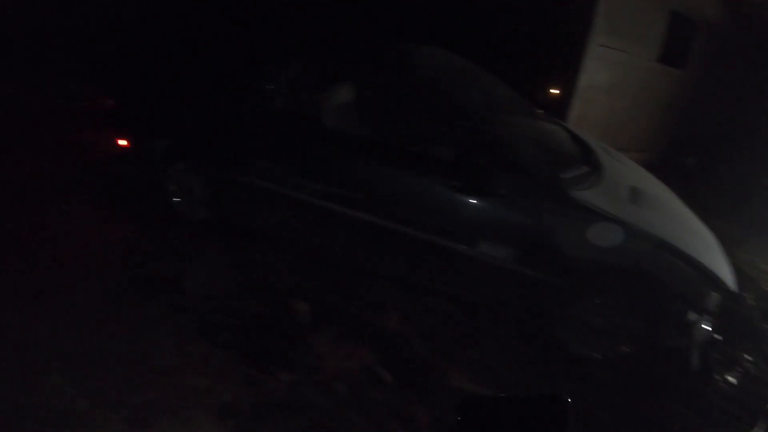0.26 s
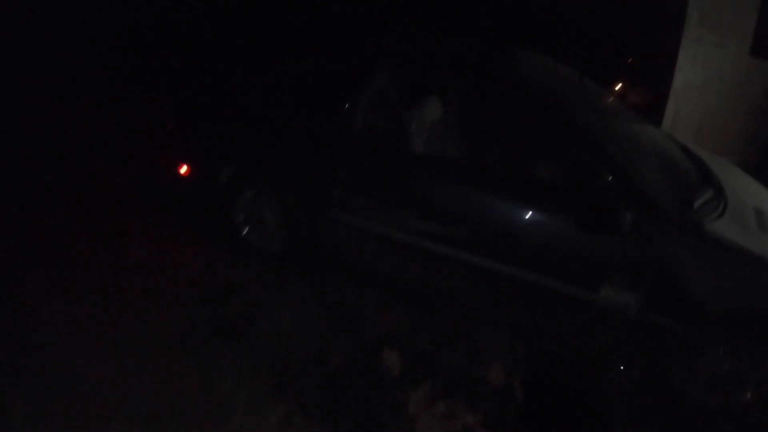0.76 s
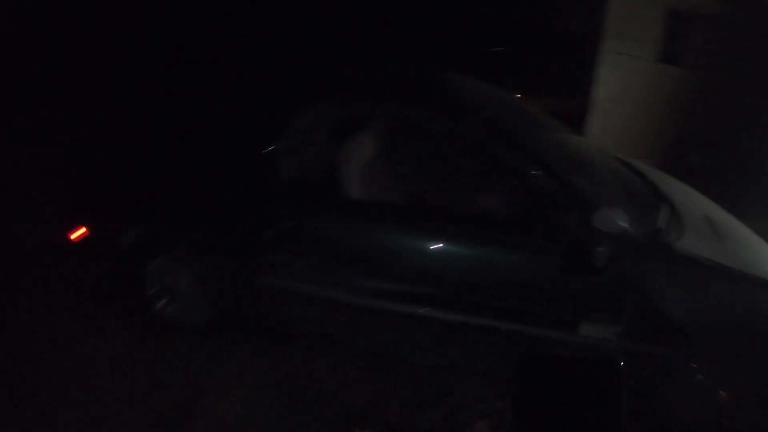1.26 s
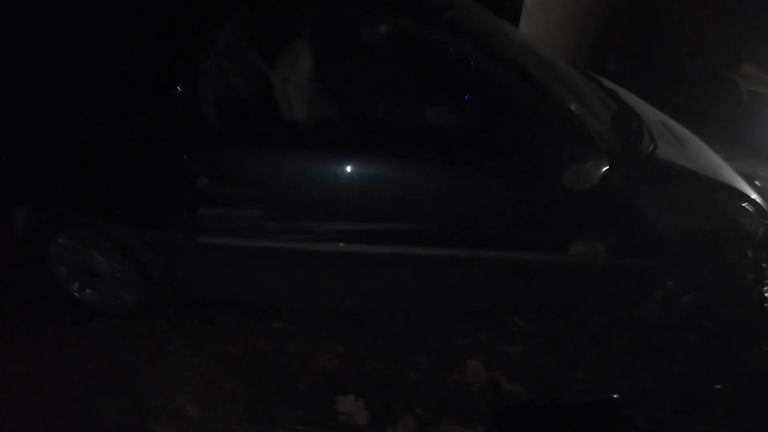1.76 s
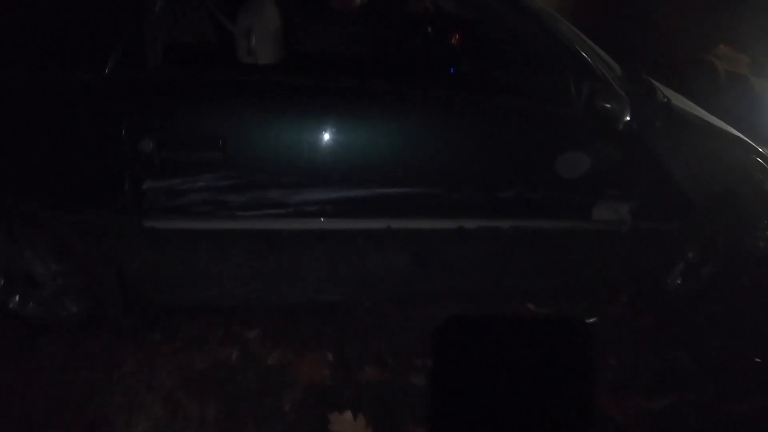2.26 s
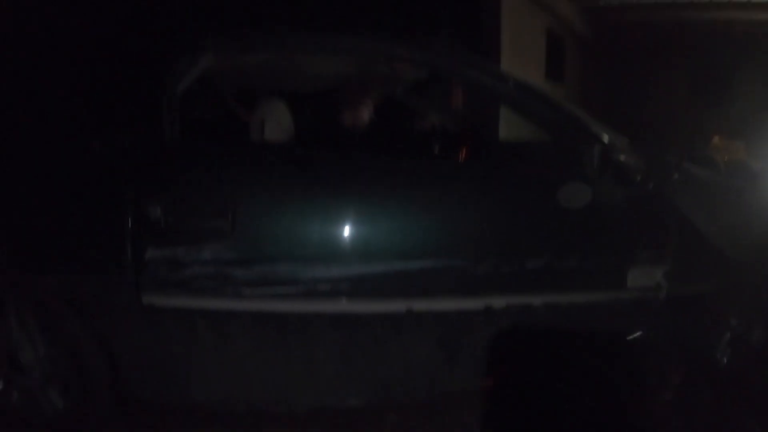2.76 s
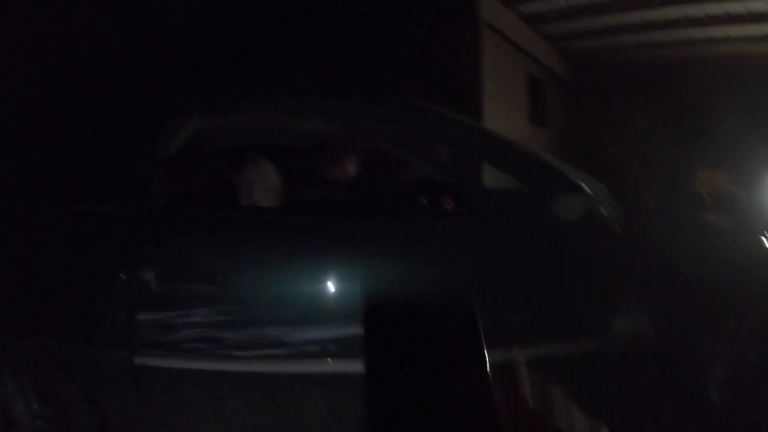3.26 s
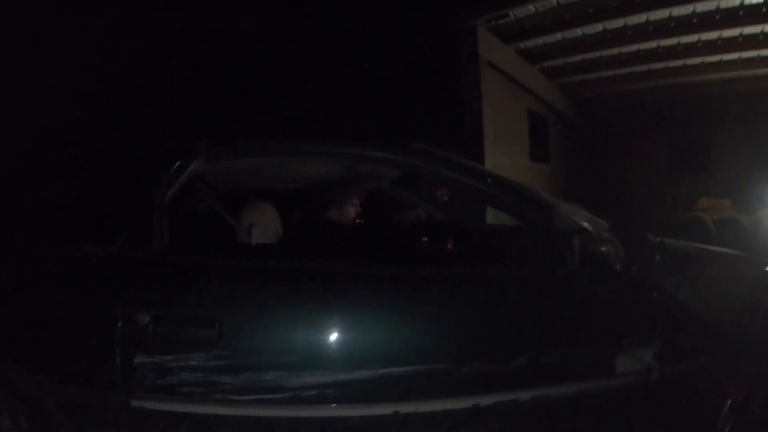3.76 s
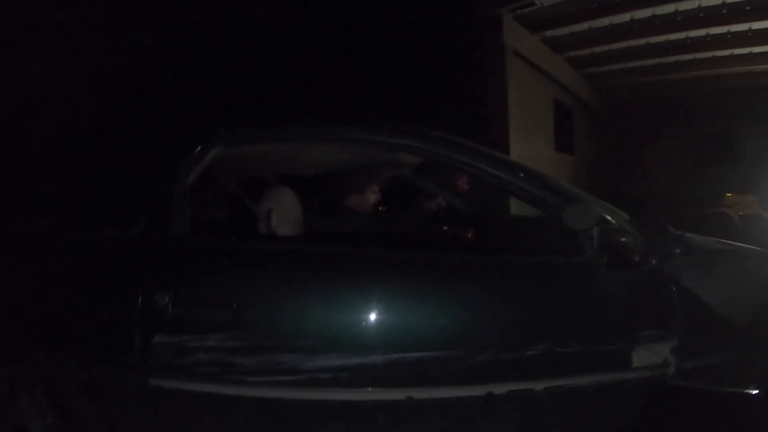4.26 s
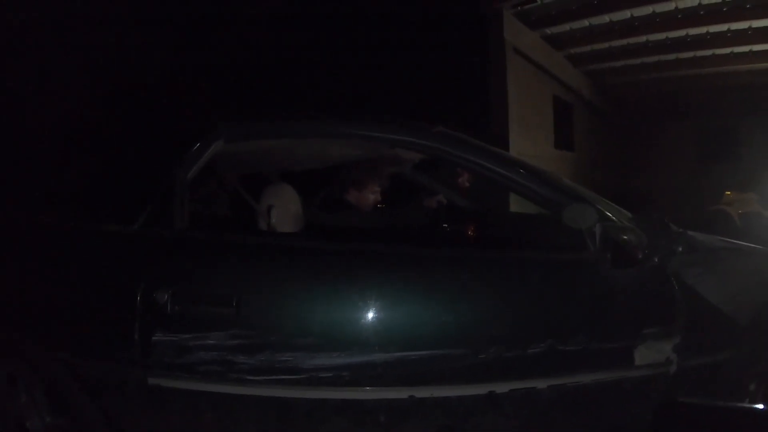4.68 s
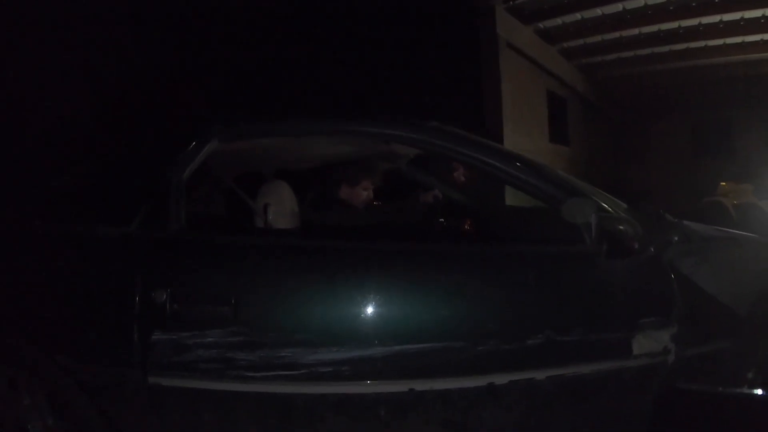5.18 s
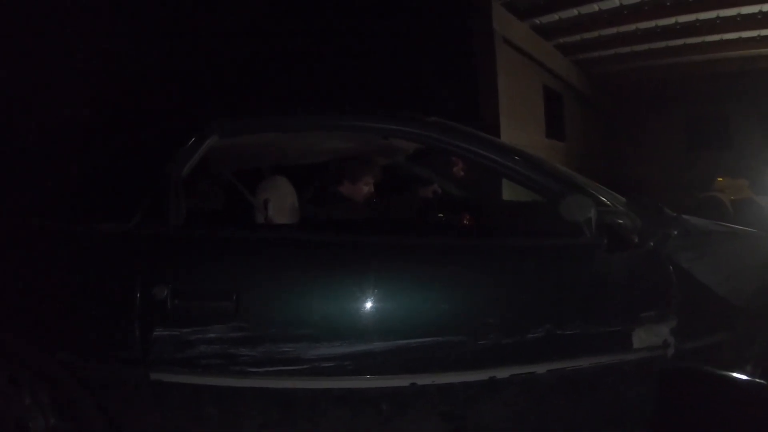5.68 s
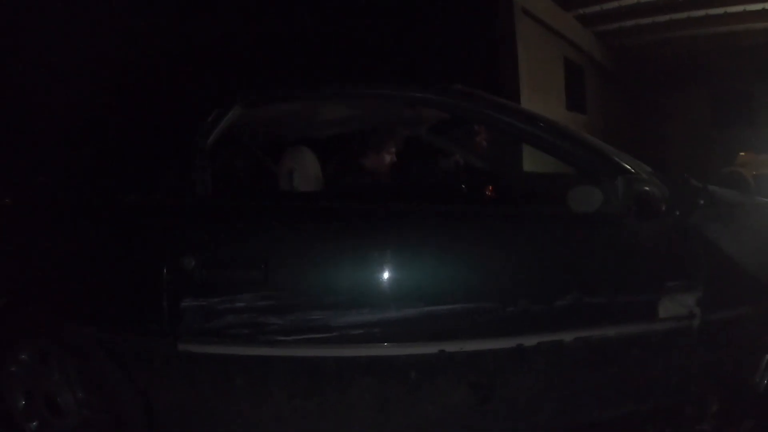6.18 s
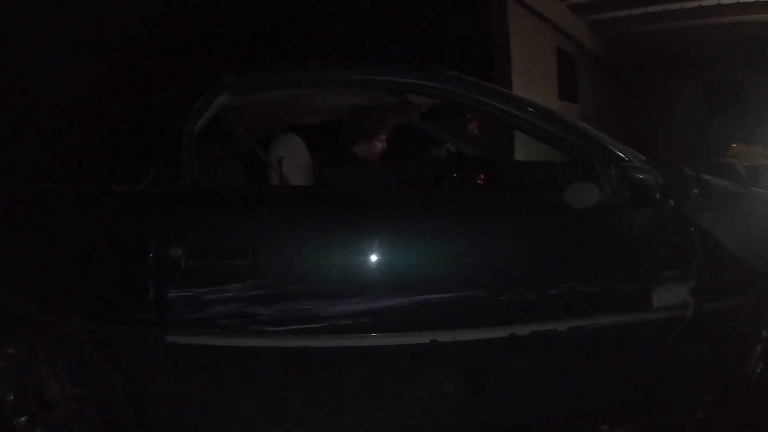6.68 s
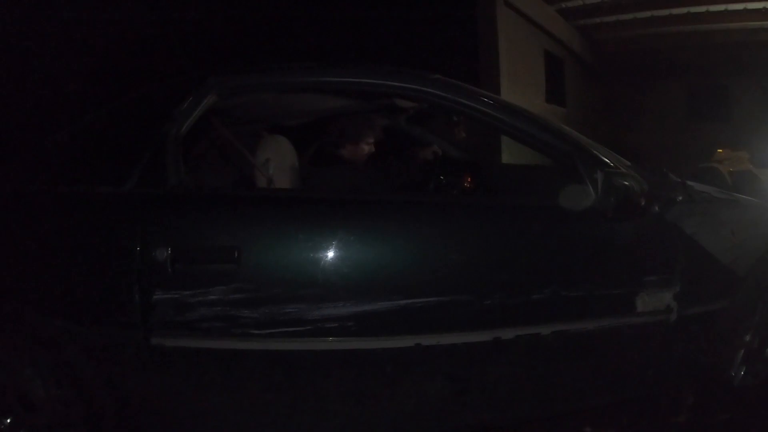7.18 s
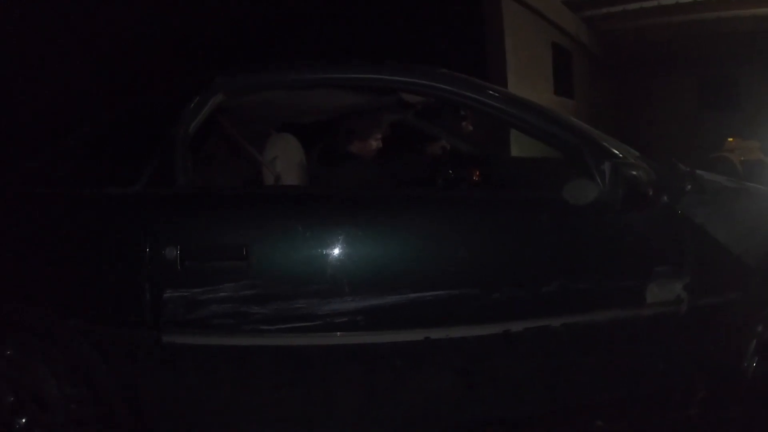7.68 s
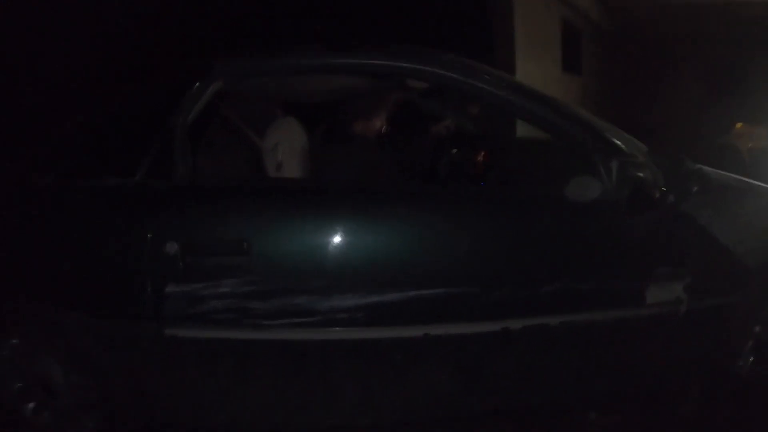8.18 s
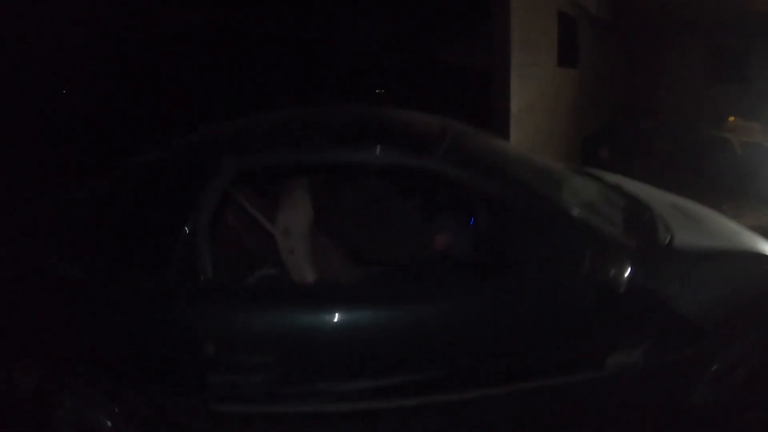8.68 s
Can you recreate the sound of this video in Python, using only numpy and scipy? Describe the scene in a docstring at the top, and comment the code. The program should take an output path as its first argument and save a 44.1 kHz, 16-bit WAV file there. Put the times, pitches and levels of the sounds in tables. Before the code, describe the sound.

At night in a yard, a large petrol car engine labours at low revs a few steps from a small stereo microphone. The throttle is dabbed over and over; the deep, uneven exhaust boom swells and sags with rough gas roar and pops. Leaves and grit crunch, mechanical hiss sits above, one brief squeal rises. Revs climb later, then the driver lifts off and the sound drops away.

```python
"""A V8 petrol car labours at low revs, the throttle dabbed again and again, until the driver lifts off.
Exhaust: multiples of the cycle boom, uneven firing pulses ring the pipes, gas roars as noise, tailpipe pops ring.
Engine bay: banded hiss, a fading rough band, one rising squeal. Low tones hum at steady pitch.
Crackle bursts are leaves and grit crunching; steady banded noise is the night in the yard.
A small two-port microphone stands a few steps from the car's side."""
import sys
import numpy as np
from scipy import signal
from scipy.fft import rfft, irfft, next_fast_len
from scipy.io import wavfile
from scipy.ndimage import uniform_filter1d

SR = 44100
rng = np.random.default_rng(int(sys.argv[2]) if len(sys.argv) > 2 else 0)


def generate_wav(signal):
    """Clip the signal to [-1, 1] and save it as 16-bit WAV at the path in sys.argv[1]."""
    frames = np.transpose(np.atleast_2d(signal))
    scaled = np.clip(frames, -1, 1) * 32767
    pcm = np.round(scaled).astype(np.int16)
    wavfile.write(sys.argv[1], SR, pcm)


N = 394246
CUTOFF_HZ = 15100


def from_db(db):
    """Gain of a level in dB."""
    return 10 ** (np.asarray(db) / 20)


def rms_one(x):
    """Scaled to unit rms."""
    return x / np.sqrt(np.mean(x ** 2) + 1e-20)


def in_time(rows):
    """Columns of a curve table, one value a sample."""
    time_s, *columns = np.transpose(rows)
    return [np.interp(np.arange(N) / SR, time_s, column) for column in columns]


def at_hz(points, hz):
    """A spectrum table read on a log-frequency axis."""
    points = np.array(points)
    return np.interp(np.log(hz), np.log(np.maximum(points[:, 0], 1)), points[:, 1])


def drift(rate_hz):
    """Slow chance of spread 1: noise through a double one-pole low-pass, run at SR / 40."""
    r = np.exp(-80 * np.pi * rate_hz / SR)
    noise = rng.standard_normal(N // 40 + 2002)
    slow = signal.lfilter([1], [1, -2 * r, r * r], noise)[2000:]
    return np.interp(np.arange(N) / 40, np.arange(len(slow)), rms_one(slow))


def resonance(x, hz, width_hz):
    """Two-pole band-pass, gain 1 on top."""
    r = np.exp(-np.pi * width_hz / SR)
    poles = [1, -2 * r * np.cos(2 * np.pi * hz / SR), r * r]
    return signal.lfilter(np.array([1, 0, -1]) * (1 - r * r) / 2, poles, x)


def white():
    """Two unrelated (mid, side) noises."""
    return rng.standard_normal((2, 2, N))


# left-right likeness: pitch_hz, likeness (0 to 1)
LIKENESS = [(60, 0.9), (250, 0.97), (500, 0.57), (1000, .75), (2000, 0.56), (4000, 0.63), (8000, 0.13),
            (12000, 0.34)]


def two_ports(mid, side, hz):
    """Left and right as alike as the pitch allows: shared mid, opposed side."""
    alike = np.clip(at_hz(LIKENESS, hz), 0, 1)
    return np.sqrt(1 + alike) * mid + np.sqrt(1 - alike) * side * [[1], [-1]]


def narrow(hz, width_hz):
    """Two-port noise passed twice through one resonance; rms 1."""
    once = resonance(rng.standard_normal((2, N)), hz, width_hz)
    mid, side = resonance(once, hz, width_hz)
    return rms_one(two_ports(mid, side, hz))


def banded(source, spectrum, patchy_db):
    """Bands of a (mid, side) source, each with its own level, flicker and likeness; rms 1."""
    low_hz, top_hz = spectrum[0][0], min(spectrum[-1][0], CUTOFF_HZ)
    count = round(2.5 * np.log2(top_hz / low_hz))  # 2.5 bands an octave
    edges_hz = np.geomspace(low_hz, top_hz, count + 1)
    out, together = 0, drift(1.9)
    for k, band_hz in enumerate(zip(edges_hz, edges_hz[1:])):
        band = signal.butter(2, band_hz, "band", fs=SR, output="sos")
        mid, side = signal.sosfilt(band, source[k % 2])
        hz = np.sqrt(band_hz[0] * band_hz[1])
        flicker_db = patchy_db * (0.4 * together + drift(18.0))
        out = out + from_db(at_hz(spectrum, hz) + flicker_db) * two_ports(mid, side, hz)
    return rms_one(out)


# steady background: pitch_hz, relative density_db (per Hz)
NIGHT = [(880, -35.5), (1500, -4.5), (1640, 6), (2300, -22.5), (3350, -25), (4630, -8), (4760, -14),
         (5690, -6.5), (7750, -30.5), (10100, -60.5), (17000, -120)]
NIGHT_DB = -59


def night_air():
    """Steady background noise in flickering bands."""
    return from_db(NIGHT_DB) * banded(white(), NIGHT, patchy_db=1.5)


# crunches of leaves and grit: start_s, level_db, decay_s (to 1/e)
CRUNCHES = [(0.5194, -32, .012), (0.7494, -38, .01), (1.2462, -31.5, .012), (1.7194, -33, 0.024),
            (1.926, -28.5, 0.0083), (2.373, -34, .01), (2.6636, -42, .008), (3.2494, -32, 0.0098),
            (3.3528, -34, .01), (3.5379, -34, 0.0078), (3.634, -36, 0.0097), (3.9441, -34, .01),
            (4.9121, -35, .01), (5.7192, -35, 0.011), (7.0694, -31.5, .012), (7.2848, -30.5, .01),
            (7.337, -30.5, 0.033), (8.1944, -41.5, .012), (8.2305, -46, 0.0082), (8.2484, -44, .01)]
# crunch colour: pitch_hz, relative density_db (per Hz)
GRIT = [(900, -5.5), (2500, 0.5), (4200, -4.5), (6200, 3.5), (8500, -10.5), (13000, -29), (15000, -35)]
CRUNCH_RISE_S, CRACKLE_CREST_DB = .0015, 10


def crunches(hiss_db):
    """Sharp bursts of dense uneven crackle; small random ones follow the hiss level."""
    swell, since_s = np.zeros(N), np.arange(6000) / SR
    for start_s, level_db, decay_s in CRUNCHES:
        shape = np.minimum(since_s / CRUNCH_RISE_S, 1) * np.exp(-since_s / decay_s)
        swell[round(start_s * SR):][:6000] += from_db(level_db - CRACKLE_CREST_DB) * shape
    starts = rng.random(N) < 9.0 / SR  # 9 a second on average
    small = starts * from_db(hiss_db - 11.5 + 4.2 * np.minimum(rng.exponential(1, N), 3))
    swell += signal.lfilter([1], [1, -np.exp(-1 / (0.0033 * SR))], small + 1e-18)
    crackle = white() * from_db(2.5 * np.minimum(rng.exponential(1, N), 4))
    return swell * banded(crackle, GRIT, patchy_db=2.0)


# hiss colour: pitch_hz, relative density_db (per Hz)
HISS = [(1500, -6), (1700, 5), (2080, 2), (2720, 2), (3250, 0.5), (3810, 0), (4720, -12), (5940, -1.5),
        (7750, -9), (10100, -21), (12500, -43), (15000, -54)]
# narrow hiss bands: pitch_hz, width_hz (each pass), level_db (re hiss), waver_db
WHINES = [(3160, 85, -16.5, 2.5), (3265, 60, -20, 2.5), (3560, 60, -17, 2.5), (6100, 1300, -5.5, .8)]
# rough band that fades and returns: time_s, level_db
RING_LEVEL = [(0, -52), (.8, -50.5), (1.5, -54), (1.9, -53), (2.6, -57), (3.1, -57.5), (4.0, -66),
              (7.9, -71), (8.15, -82), (8.22, -61), (8.38, -80), (8.62, -62), (8.94, -56)]
RING_HZ, RING_WIDTH_HZ = 1310, 330
# brief rising squeal: time_s, pitch_hz, level_db
SQUEAL = [(2.44, 1572, -73), (2.5, 1623, -55), (2.53, 1657, -51), (2.57, 1720, -53), (2.62, 1699, -53),
          (2.68, 1760, -57), (2.76, 1759, -78)]
SQUEAL_HZ, SQUEAL_WIDTH_HZ, SQUEAL_HISS_DB = 1670, 200, 0  # rough band around the squeal


def engine_bay(hiss_db):
    """Belts, fan and valve gear blur into hiss with narrow bands; a lower band fades, one squeal rises."""
    hiss = banded(white(), HISS, patchy_db=1.6)
    for hz, width_hz, level_db, waver_db in WHINES:
        hiss = hiss + from_db(level_db + waver_db * drift(1.2)) * narrow(hz, width_hz)
    ring = from_db(in_time(RING_LEVEL)[0]) * narrow(RING_HZ, RING_WIDTH_HZ)
    squeal_hz, squeal_db = in_time(SQUEAL)
    unsteady_hz = squeal_hz + 12 * drift(30)
    tone = np.sqrt(2) * np.sin(2 * np.pi * np.cumsum(unsteady_hz) / SR)
    squeal = tone + from_db(SQUEAL_HISS_DB) * narrow(SQUEAL_HZ, SQUEAL_WIDTH_HZ)
    return from_db(hiss_db) * hiss + from_db(squeal_db) * squeal + ring


# steady low tones: pitch_hz, level_db (re hum level)
HUM_TONES = [(34.5, 2.5), (69, -5), (103.5, 0), (173, -9.5), (259, -16)]
# hum level: time_s, level_db (added to the engine's share)
HUM_LEVEL = [(0, 5), (.2, 7), (.32, -0.5), (.45, -1), (.7, -1), (1.0, -4), (1.5, -5), (1.9, 2), (2.3, 1),
             (2.7, 4), (3.2, 1), (4.0, -1.5), (4.6, -0.5), (5.0, -5), (5.4, 3), (6.0, -6), (7.0, -7),
             (7.8, -6.5), (8.1, -4), (8.94, -7.5)]


def hum(swing_db):
    """Low tones hold their pitch while the revs move, and waver in level."""
    time_s, (level_db,) = np.arange(N) / SR, in_time(HUM_LEVEL)
    out = 0
    for hz, tone_db in HUM_TONES:
        gain = from_db(level_db + swing_db + tone_db + 2.8 * drift(2.0))
        out = out + gain * np.sin(2 * np.pi * (hz * time_s + rng.random()))
    return out


# dabs of throttle: pressed_s, released_s, boom_db, harshness_db, jolt_db
DABS = [(0.0, 0.19, -20.5, 0.5, 1), (0.455, 0.63, -20.5, -0.5, 0.5), (0.624, 0.74, -17, -0.5, 1.5),
        (0.902, 1.48, -18.5, 1.5, -1.5), (1.52, 1.6, -18.5, 0.5, -4), (1.805, 2.88, -18, -0.3, -1.5),
        (2.873, 2.98, -20, -3, -1.5), (3.15, 3.37, -18, 1, -3), (3.525, 3.84, -17.5, -0.5, 3),
        (3.9, 4.46, -18.5, 2, 2), (4.49, 5.52, -17.5, 0, -1.5), (5.547, 5.97, -19.5, 4, -2),
        (5.872, 6.6, -17, 0, 0), (6.828, 7, -17.5, -5.5, 6.5), (7.081, 7.078, -16.5, -4.5, 3.5),
        (7.192, 7.04, -15.5, -2, -1), (7.31, 7.75, -17, 0.5, 6), (7.533, 7.89, -17.5, 2.5, -2),
        (7.97, 8.01, -25, -6, 3), (8.13, 8.16, -24, -7, 1.5), (8.2, 8.33, -24, -4.5, -2.5),
        (8.39, 8.43, -26, -8.5, -0.5), (8.72, 9.3, -25.5, -9.5, 3.5), (8.86, 8.943, -21.5, -3, -2.5)]
RISE_DB_PER_S, FALL_DB_PER_S, COAST_DB = 138, 94, -29
FULL_DB = -18  # reference load
JOLT_S = 0.2  # to 1/e


def throttle():
    """Load (dB re full) and harshness from the strongest dab; each dab adds a dying jolt."""
    time_s = np.arange(0, N / SR + .002, .002)[:, None]
    pressed_s, released_s, boom_db, harsh_db, jolt_db = np.transpose(DABS)
    before_s, after_s = np.maximum(pressed_s - time_s, 0), np.maximum(time_s - released_s, 0)
    ramps_db = boom_db - RISE_DB_PER_S * before_s - FALL_DB_PER_S * after_s
    load_db = np.maximum(ramps_db.max(axis=1), COAST_DB) - FULL_DB
    harshness_db = uniform_filter1d(harsh_db[ramps_db.argmax(axis=1)], size=30)
    decay = np.exp(-np.maximum(time_s - pressed_s, 0) / JOLT_S) * (time_s >= pressed_s)
    jolts_db = np.sum(jolt_db * decay, axis=1)
    return in_time(np.column_stack([time_s, load_db, harshness_db, jolts_db]))


# firings in order: level_db, pipe_delay_ms
CYLINDERS = [(-1.5, 1.34), (-3, 3.96), (-4, 0.77), (1, 0.31), (-11.5, 4.42), (-2, 3.27), (-3.5, 1.31),
             (-1.5, 3.13)]


def firings(cycles, spread_db, jitter_s):
    """Eight clicks a cycle; each cylinder has its own strength and pipe delay, plus chance."""
    count = np.floor(8 * cycles).astype(int)
    at = np.flatnonzero(np.diff(count))
    level_db, delay_ms = np.array(CYLINDERS)[count[at] % 8].T
    chance = rng.standard_normal((1200, 2))[:len(at)]
    delay_s = delay_ms / 1000 + jitter_s * chance[:, 0]
    arrive = at + (SR * delay_s).astype(int)
    clicks = np.zeros(N)
    clicks[np.clip(arrive, 0, N - 1)] = from_db(level_db + spread_db * chance[:, 1])
    return clicks


# exhaust gas colour: pitch_hz, relative density_db (per Hz)
ROAR = [(14, -15), (28, -9), (60, -18), (108, -10), (182, -13), (242, -15.5), (403, -24), (557, -25),
        (628, -29.5), (760, -41)]
# body panels and intake colour: pitch_hz, relative density_db (per Hz)
RATTLE = [(380, -37.5), (650, -2), (732, 1), (798, -0.5), (983, 3), (1470, -19.5), (1800, -25.5),
          (2340, -50.5), (3960, -120)]


def gas_roar(clicks, roar_db, rattle_db):
    """Turbulent gas noise, lightly puffed by each firing, and the car's shell buzzing along."""
    puffs = signal.lfilter([1], [1, -np.exp(-1 / (0.0027 * SR))], clicks)
    gas = white() * (1.5 + puffs)
    roar = from_db(roar_db) * banded(gas, ROAR, patchy_db=1.0)
    return roar + from_db(rattle_db) * banded(gas, RATTLE, patchy_db=1.0)


# tailpipe pops: start_s, level_db
POPS = [(0.941, -27.5), (2.194, -26), (2.554, -26.5), (3.349, -24.5), (5.353, -27), (6.69, -24),
        (7.4, -18.5), (7.418, -22.5), (7.922, -30), (8.211, -29.5), (8.24, -31), (8.278, -36), (8.432, -43),
        (8.815, -35), (8.874, -35), (8.9, -29)]
# modes a pop rings: pitch_hz, level_db, t60_s
TAILPIPE = [(180, -8, 0.13), (301, -2, 0.06), (454, -6.5, 0.065), (562, -8, 0.046), (734, -7.5, 0.034),
            (1030, -14.5, 0.017)]
POP_SOFT_HZ = 1800


def pops():
    """Unburnt gas pops ring decaying tailpipe modes, each with a chance strength, dulled on top."""
    start_s, pop_db = np.transpose(POPS)
    chance, out = rng.standard_normal((len(start_s), len(TAILPIPE))), 0
    for k, (hz, mode_db, t60_s) in enumerate(TAILPIPE):
        clicks = np.full(N, 1e-18)
        clicks[(start_s * SR).astype(int)] = from_db(pop_db + mode_db + 2 * chance[:, k])
        r, w = from_db(-60 / (t60_s * SR)), 2 * np.pi * hz / SR
        out = out + signal.lfilter([0, np.sin(w)], [1, -2 * r * np.cos(w), r * r], clicks)
    return signal.sosfilt(signal.butter(2, POP_SOFT_HZ, fs=SR, output="sos"), out)


# 12th to 34th multiple of the cycle: level_db (re one firing a cycle)
GROWL_DB = [6, 10.5, 19.5, 16, 11.5, 11, 13.5, 10, 10.5, 12.5, 15.5, 14.5, 16.5, 15.5, 7, 15.5, 7.5, 10.5,
            5, 9.5, 15, 4, 7]


def growl(cycles, cycles_hz):
    """The regular part of the firing: upper multiples of the cycle, scaled like a pulse train's."""
    tones = 0
    for k, level_db in enumerate(GROWL_DB, 12):
        gain = from_db(level_db + 1.5 * drift(2))
        tones = tones + gain * np.sin(2 * np.pi * (k * cycles + rng.random()))
    return 2 * cycles_hz / SR * tones


# upper pipe modes: pitch_hz, width_hz (each pass), gain_db
PIPES = [(114.4, 5.5, -12), (143, 30, -5.5), (162.2, 19.5, 2), (178.9, 25, 1), (207, 26, -11),
         (258.6, 17, -13), (324, 55.5, -10.5), (444.8, 26, -11.5), (497.5, 35, -14.5), (563.7, 32, -11.5)]
# level of the ringing pipes: time_s, level_db
BARK_LEVEL = [(0.0, -31.5), (0.25, -27.5), (0.37, -41), (0.55, -28.5), (0.74, -33.5), (1.04, -21.5),
              (1.44, -22), (1.72, -35), (2.09, -24), (2.14, -30.5), (2.41, -18.5), (2.46, -22.5),
              (2.51, -19.5), (2.61, -23.5), (2.66, -22), (3.09, -38.5), (3.39, -25), (3.44, -35),
              (4.26, -21), (4.56, -28.5), (5.45, -26), (5.73, -19.5), (6.37, -24.5), (6.4, -22), (6.6, -23),
              (6.75, -21.5), (7.24, -35.5), (7.34, -19), (7.37, -30), (7.42, -19.5), (7.77, -31),
              (7.79, -20), (7.87, -28), (7.95, -32), (8.1, -36.5), (8.25, -32), (8.45, -35.5), (8.64, -39),
              (8.81, -32), (8.94, -38.5)]


def bark(pulses):
    """Firing pulses ring the upper pipe modes; their level is evened, then follows BARK_LEVEL."""
    rung = 0
    for k, (hz, width_hz, gain_db) in enumerate(PIPES):
        once = resonance(pulses + 1e-18, hz, width_hz)
        rung = rung + (-1) ** k * from_db(gain_db) * resonance(once, hz, width_hz)
    level = np.sqrt(uniform_filter1d(rung ** 2, SR // 4) + 1e-12)
    return from_db(in_time(BARK_LEVEL)[0]) * rung / level


# 3rd to 22nd multiple of the cycle: relative level_db
ORDERS_DB = [-30, -35.5, -31, -30, -31.5, -14.5, -25, -33, -17, -24, -29, -23, -26.5, -22, -27, -23.5, -31,
             -30.5, -27.5, -29]
# what the low pipes pass: pitch_hz, gain_db
SILENCER = [(20, -24), (28, -16), (34, -3.5), (40, -6.5), (48, -2), (58, -1), (66, -2), (74, -2), (82, -12),
            (92, -21.5), (99, -15.5), (104, -4.5), (112, -8), (135, -24.5), (160, -10), (180, -15.5),
            (230, -16.5)]
# firing pattern shifts: time_s, fifth_db, eighth_db, third_and_sixth_db
PATTERN = [(0, -17, -12, -5), (.5, 0, -0.5, -5), (.9, -1, -2.5, -5), (1.5, -2, -4.5, -5),
           (1.7, -3, 3.5, -5), (1.9, -3, -4.5, -5), (2.3, 4, -2.5, -5), (2.8, 4, -0.8, -5),
           (3.05, -1.5, -4, -5), (3.5, -2, -2, -5), (3.9, -1, -1.5, -5), (4.5, -5.5, -5.5, -8),
           (5.4, 2.5, -3, -8), (5.75, 0, 0, -8), (5.9, 18, -5, -8), (6.7, 16, -1, -8), (6.8, 2, 1, 14),
           (7.25, 8, -2.5, 14), (7.35, 17, -6, -5), (7.55, 12.5, 4, -8), (7.88, 20, 2, -5),
           (8.0, 5, -8, 14), (8.2, 5, -3, 8), (8.45, 12, 3.5, -3), (8.65, 13, -9, 10), (8.94, 5.5, -2, 12)]
# shift of the 11th multiple: time_s, eleventh_db
ELEVENTH = [(0, 2.5), (.8, -3.5), (1.1, -5), (1.8, -2), (2.05, 2), (2.3, -3), (2.9, -3), (3.3, 3),
            (3.65, 1), (4.1, -5.5), (4.7, 0), (5.3, 0), (5.6, -6), (8.94, -2)]
LUMP_DB = .6  # unevenness


def boom(cycles, cycles_hz, load_db):
    """Two unevenly firing banks: cycle multiples, shaped by silencer resonances, under one load level."""
    fifth_db, eighth_db, thirds_db = in_time(PATTERN)
    shifts_db = {3: thirds_db, 5: fifth_db, 6: thirds_db, 8: eighth_db, 11: in_time(ELEVENTH)[0]}
    tones, power = 0, 0
    for k, order_db in enumerate(ORDERS_DB, 3):
        passed_db = at_hz(SILENCER, k * cycles_hz)
        gain = from_db(order_db + shifts_db.get(k, 0) + passed_db + drift(2.2))
        tones = tones + gain * np.sin(2 * np.pi * (k * cycles + rng.random()))
        power = power + gain ** 2 / 2
    return from_db(FULL_DB + load_db + LUMP_DB * drift(11.0)) * tones / np.sqrt(power)


# echoes off the building: delay_s, level_db (halved in amplitude at each port)
WALL_ECHOES = [(.019, -11), (.034, -13), (.057, -16)]


def walls(x):
    """A few echoes off the building, of opposite sign at the two ports; the end wraps to the start."""
    echo = sum(from_db(level_db) * np.roll(x, round(delay_s * SR)) for delay_s, level_db in WALL_ECHOES)
    return x + echo * [[.5], [-.5]]


# engine speed, sagging between dabs: time_s, four_stroke_cycle_hz
SPEED = [(0.0, 5.87), (0.3, 6.5), (0.5, 4.56), (0.65, 4.38), (0.82, 5.83), (1.0, 7.2), (1.2, 7.54),
         (1.42, 7.36), (1.57, 6.35), (1.77, 4.56), (1.94, 4.3), (2.04, 6.3), (2.14, 6.5), (2.29, 7.6),
         (2.39, 7.7), (2.54, 6.47), (2.62, 7.05), (2.9, 7.1), (3.09, 4.47), (3.25, 5.6), (3.37, 5.75),
         (3.51, 4.74), (3.73, 5.3), (3.96, 7.47), (4.11, 7.56), (4.3, 7.3), (4.53, 6.47), (4.7, 5.96),
         (4.95, 5.62), (5.28, 5.96), (5.55, 7.9), (5.8, 9.7), (6.0, 12.1), (6.2, 11.85), (6.5, 11.44),
         (6.72, 12.4), (6.85, 12.34), (7.0, 11), (7.22, 9.7), (7.32, 11.3), (7.45, 12.2), (7.6, 12.86),
         (7.84, 13.1), (8.0, 13.4), (8.17, 11.48), (8.27, 11.5), (8.4, 12.8), (8.55, 12.4), (8.7, 10.9),
         (8.94, 9.7)]
# engine-bay hiss: time_s, level_db
BAY_LEVEL = [(0, -51.5), (1.1, -47), (1.6, -51), (2.6, -48.5), (3.0, -53), (3.4, -50), (4.1, -48.5),
             (7.2, -49.5), (7.36, -48.5), (7.88, -51), (8.1, -64), (8.4, -69), (8.7, -85), (8.94, -79)]
# engine laws: reference_db, then dB per: load_db, cycle_hz, harshness_db, jolt_db
ROAR_LAW = (-28.5, 0.45, 0.4, 1.02, 0.76)
RATTLE_LAW = (-45, 0.5, 0.0, 0.6, 1.2)
HUM_LAW = (-30, 0.36, 0.0, -0.4, 0)
REFERENCE_CYCLE_HZ = 6.8


def scene():
    """Night, ground, engine bay and exhaust, driven by one engine speed and throttle."""
    (cycles_hz,), (hiss_db,) = in_time(SPEED), in_time(BAY_LEVEL)
    load_db, harsh_db, jolt_db = throttle()
    state = np.array([np.ones(N), load_db, cycles_hz - REFERENCE_CYCLE_HZ, harsh_db, jolt_db])
    roar_db, rattle_db, hum_db = np.array([ROAR_LAW, RATTLE_LAW, HUM_LAW]) @ state
    cycles = np.cumsum(cycles_hz) / SR
    clicks = firings(cycles, spread_db=1.0, jitter_s=.00015)
    background = night_air() + crunches(hiss_db) + engine_bay(hiss_db)
    pipes = boom(cycles, cycles_hz, load_db) + bark(clicks + growl(cycles, cycles_hz))
    exhaust = walls(pipes + hum(hum_db) + pops())
    return background + gas_roar(clicks, roar_db, rattle_db) + exhaust


# port level: pitch_hz, left_minus_right_db
BALANCE_DB = [(30, -3.5), (110, -3.5), (200, -4), (360, -6), (660, -6.5), (1210, -3), (2200, -2.5),
              (4010, -1), (7300, .8), (12000, 1)]
# port phase: pitch_hz, left_lead_rad
LEFT_LEADS = [(0, 0), (340, 0.1), (950, 1.6), (1550, 1.4), (2500, 0.4), (4220, 0.1), (5430, 0.8),
              (5680, 0.7), (7490, 2.5)]


def record(dry):
    """The two ports differ in level and phase by frequency; peaks are rounded, the top is cut."""
    margin = 4096
    size = next_fast_len(N + 2 * margin)
    hz = np.maximum(np.fft.rfftfreq(size, 1 / SR), 1)
    half = from_db(at_hz(BALANCE_DB, hz) / 2) * np.exp(.5j * at_hz(LEFT_LEADS, hz))
    heard = rfft(np.pad(dry, [(0, 0), (margin, margin)], "reflect"), size)
    ports = irfft(heard * np.array([half, 1 / half]), size)[:, margin:margin + N]
    rounded = 0.9 * np.tanh(ports / 0.93)
    return signal.sosfilt(signal.cheby2(12, 70, CUTOFF_HZ, fs=SR, output="sos"), rounded)


dry = scene()
out = record(dry)
generate_wav(out)
```